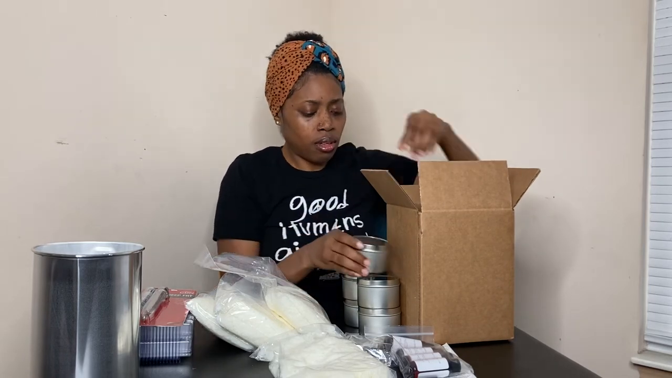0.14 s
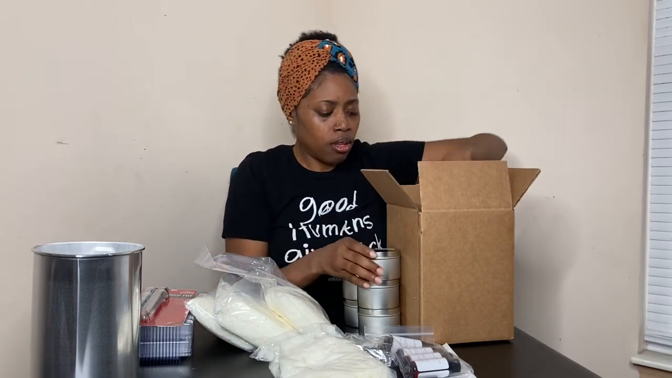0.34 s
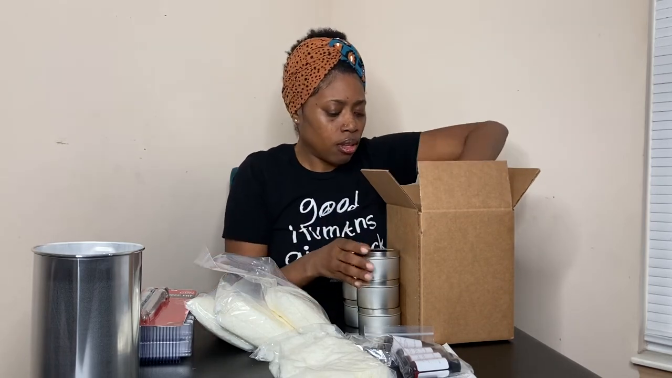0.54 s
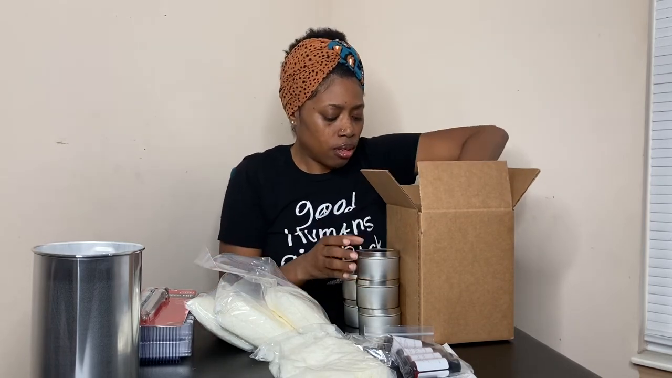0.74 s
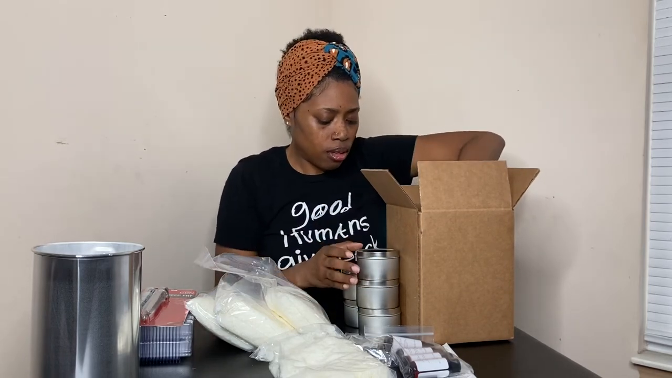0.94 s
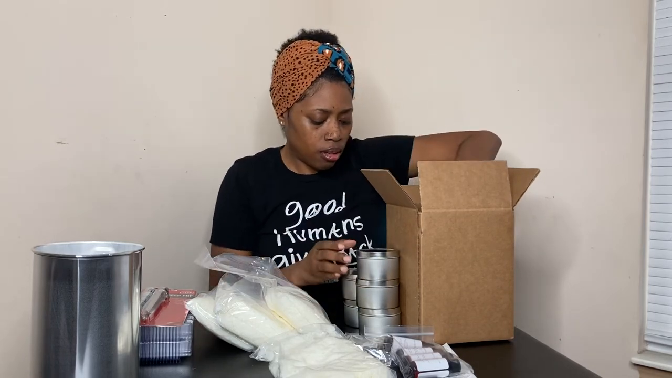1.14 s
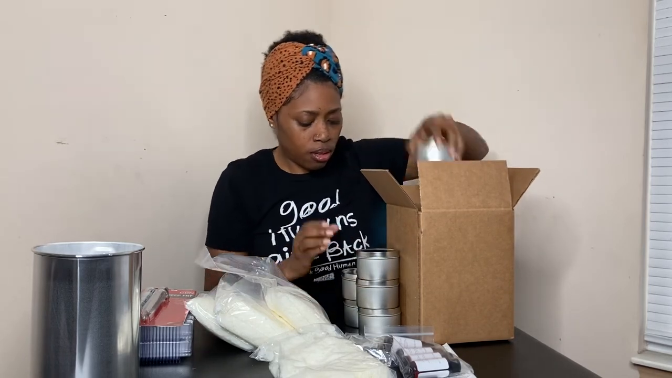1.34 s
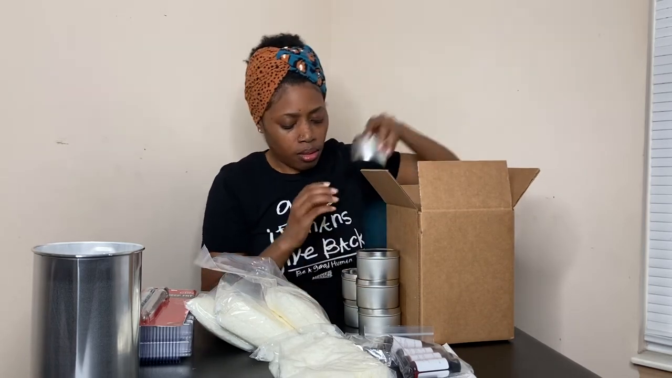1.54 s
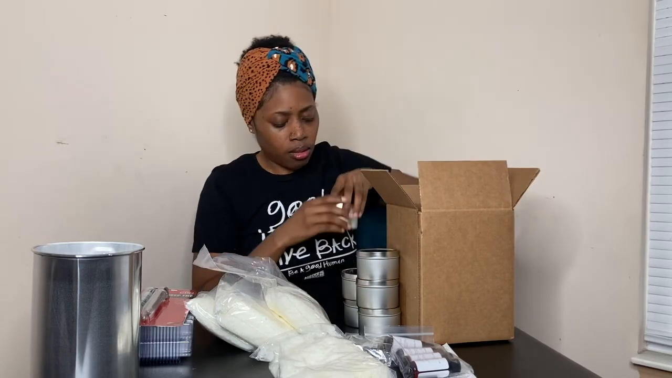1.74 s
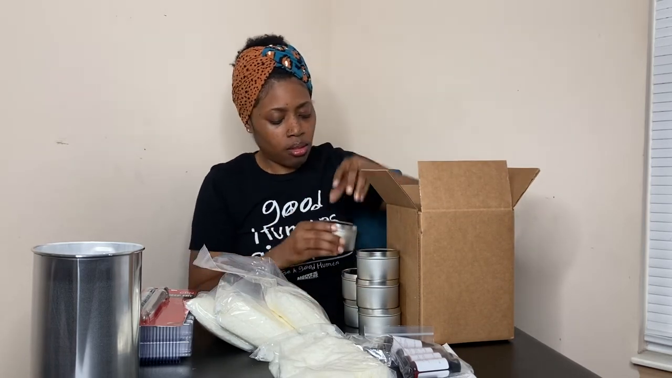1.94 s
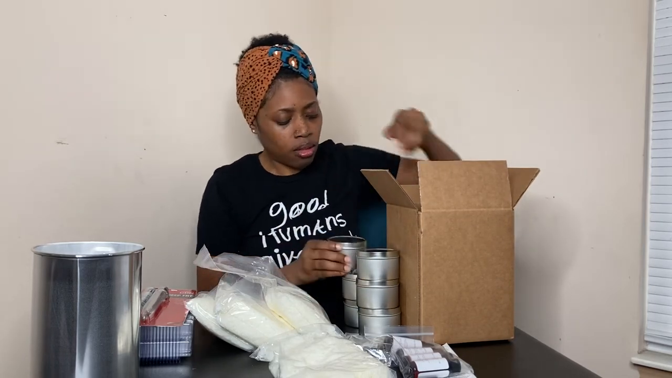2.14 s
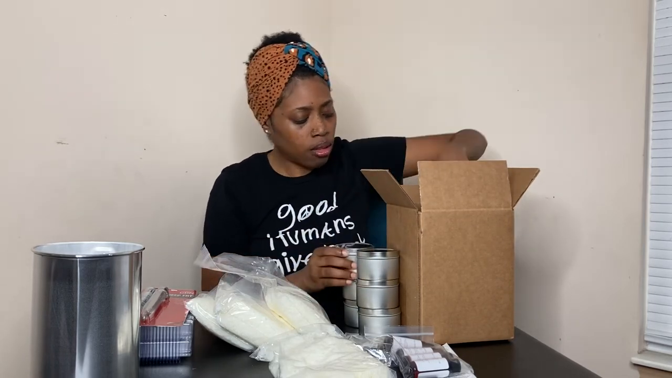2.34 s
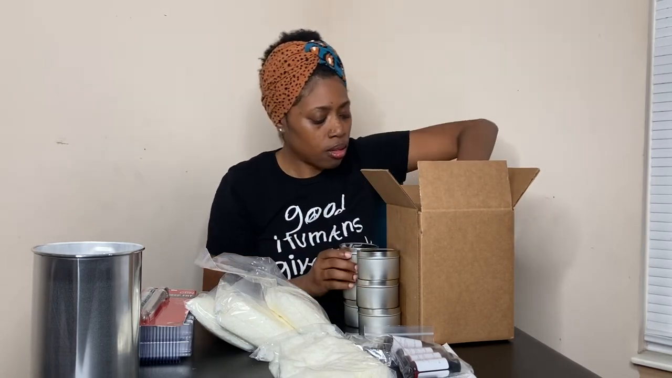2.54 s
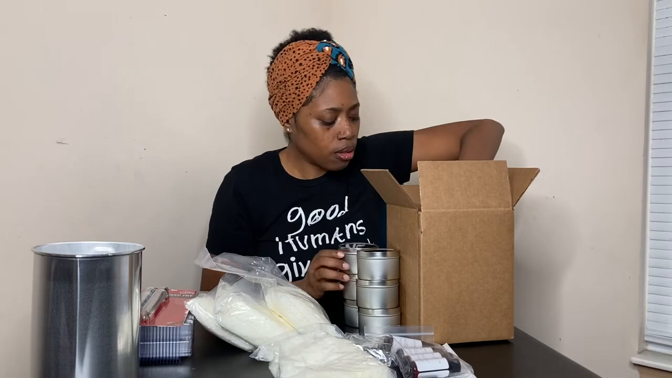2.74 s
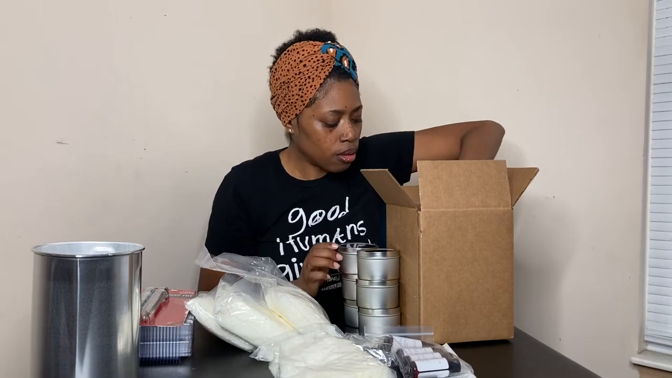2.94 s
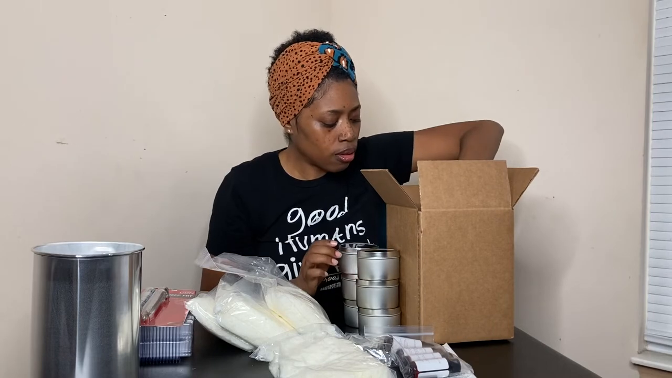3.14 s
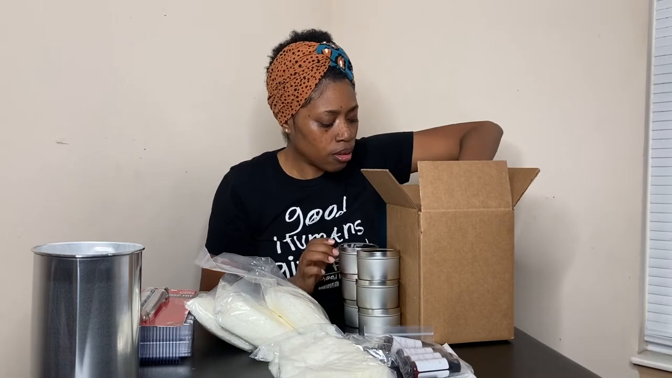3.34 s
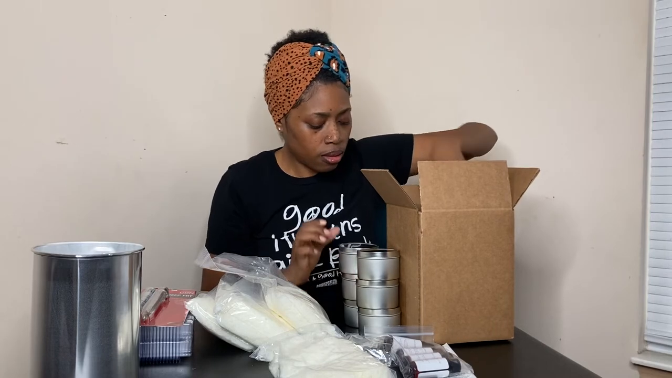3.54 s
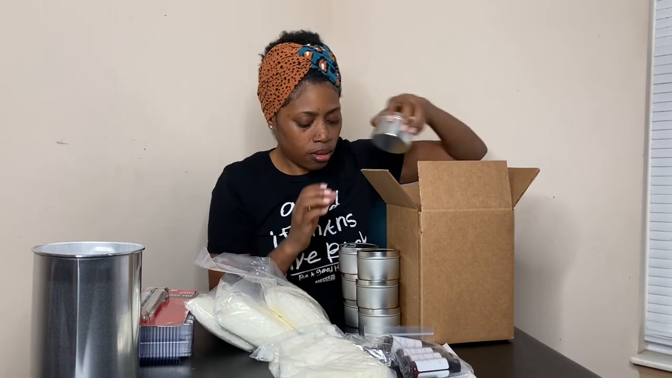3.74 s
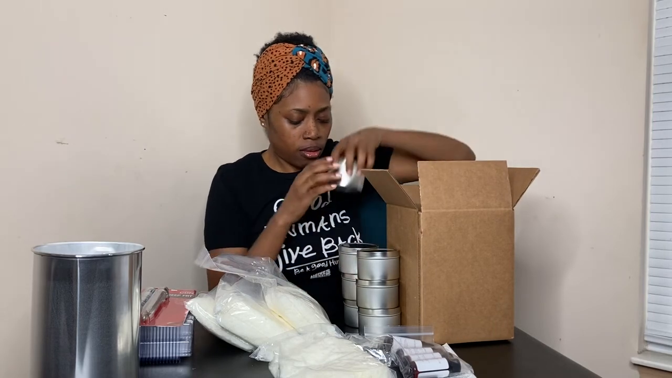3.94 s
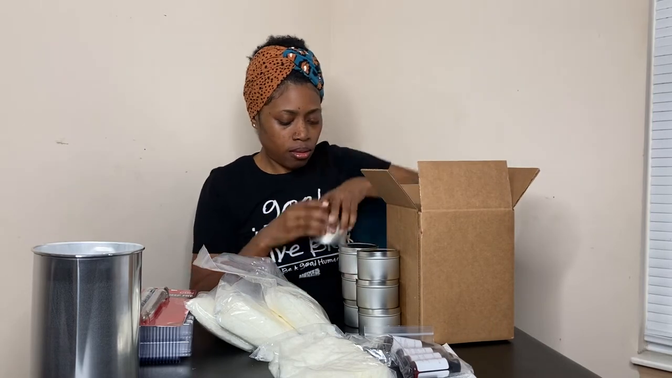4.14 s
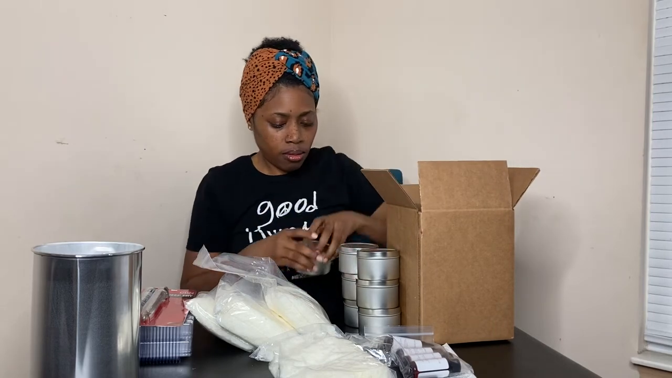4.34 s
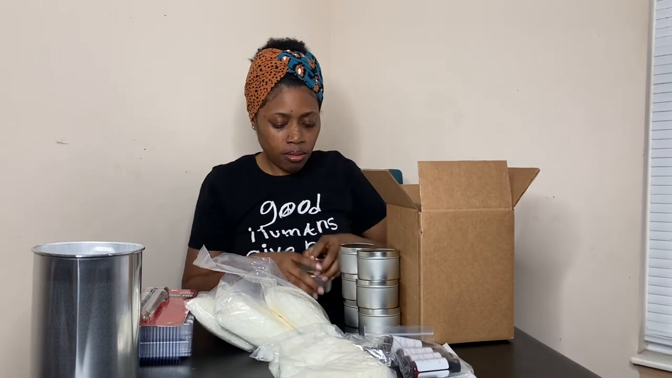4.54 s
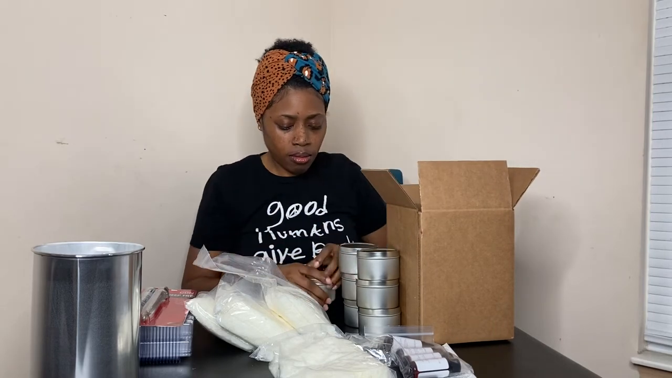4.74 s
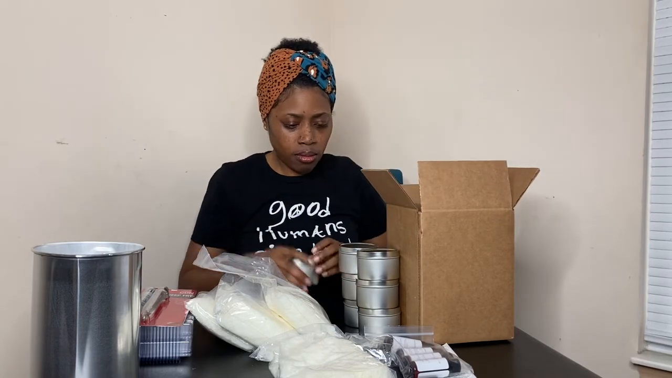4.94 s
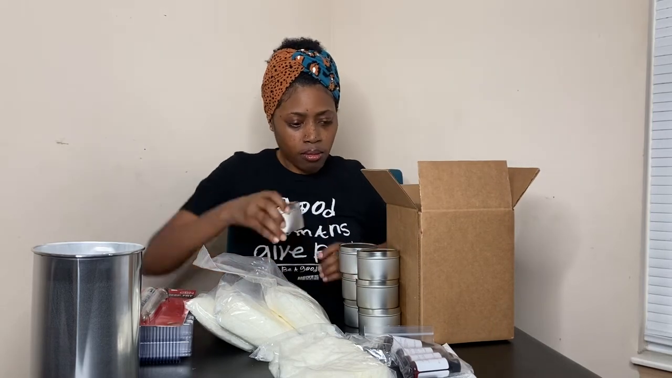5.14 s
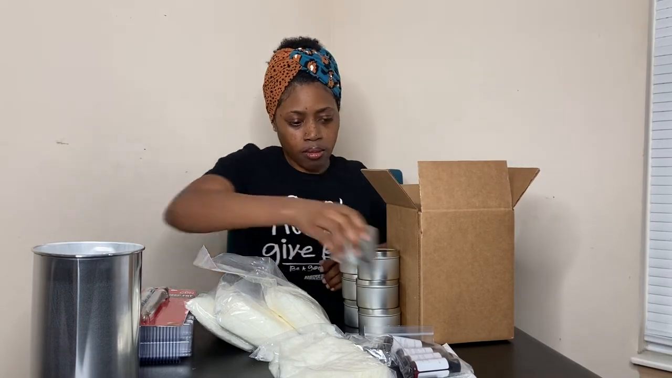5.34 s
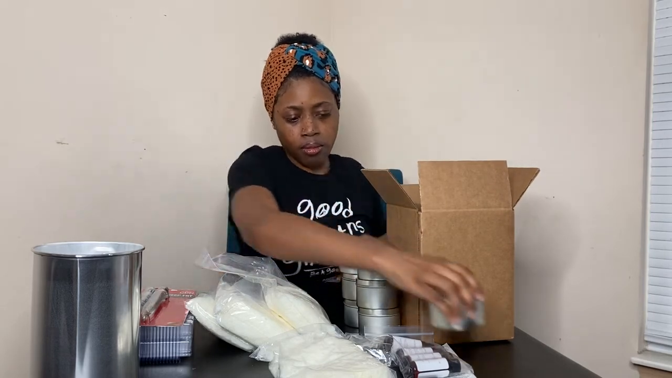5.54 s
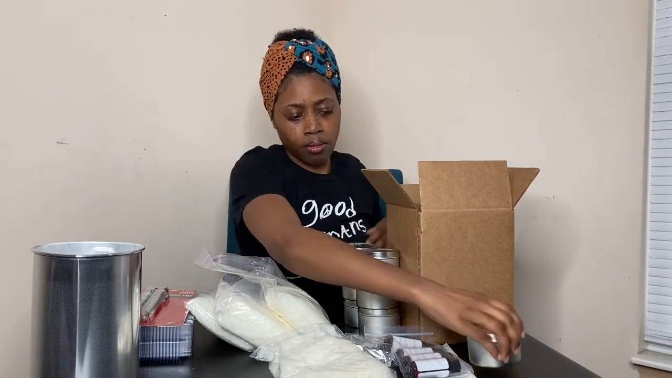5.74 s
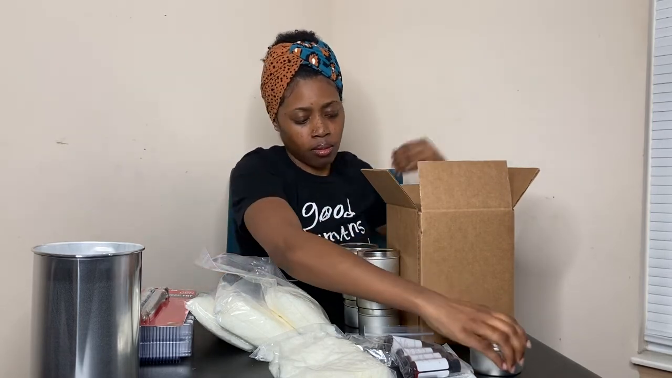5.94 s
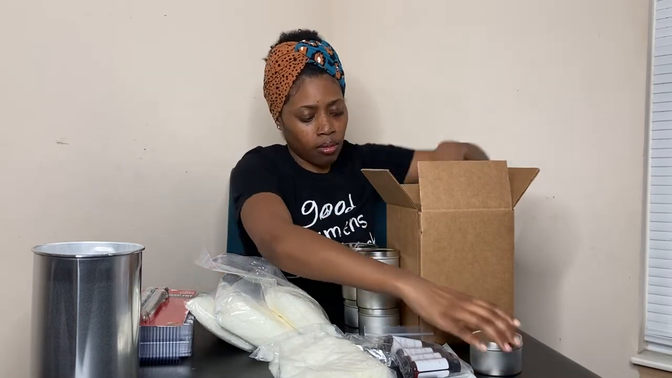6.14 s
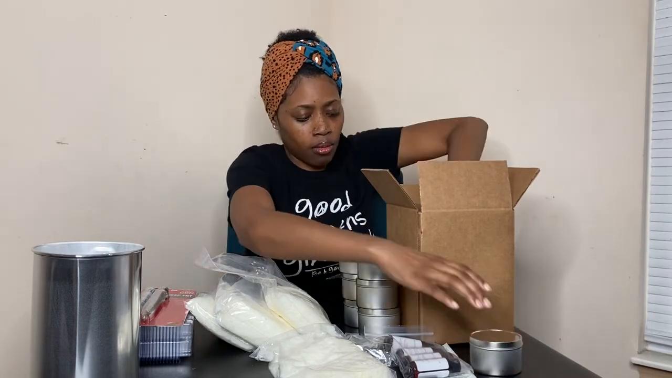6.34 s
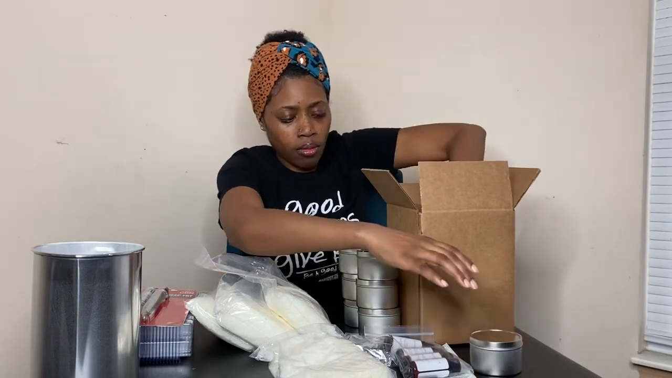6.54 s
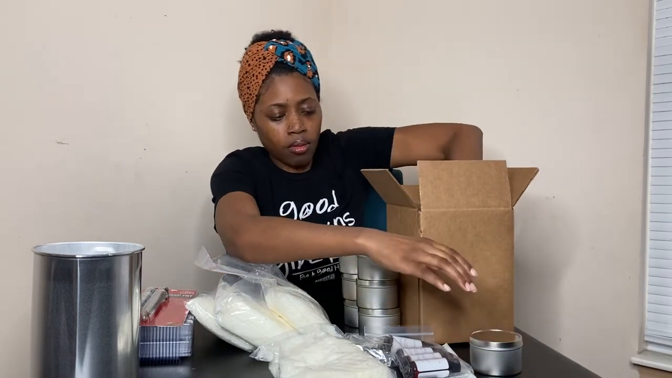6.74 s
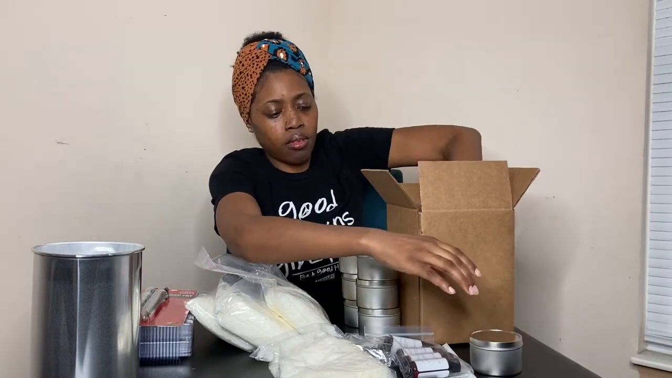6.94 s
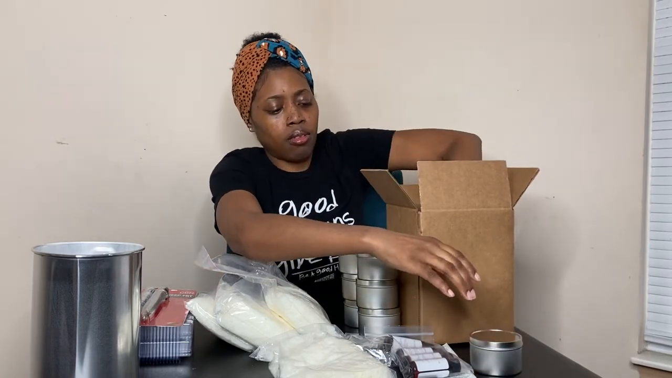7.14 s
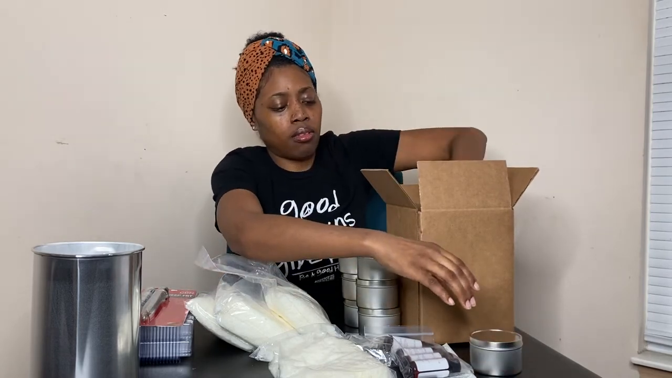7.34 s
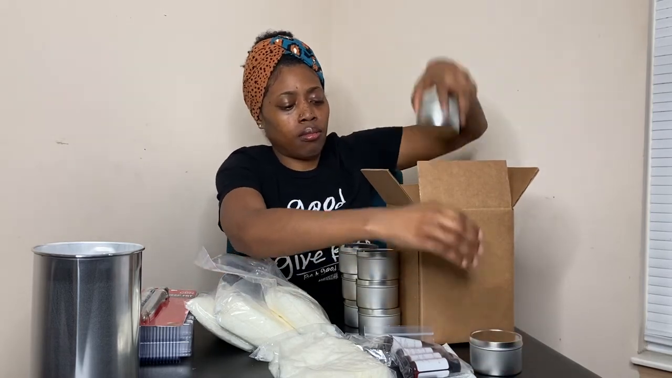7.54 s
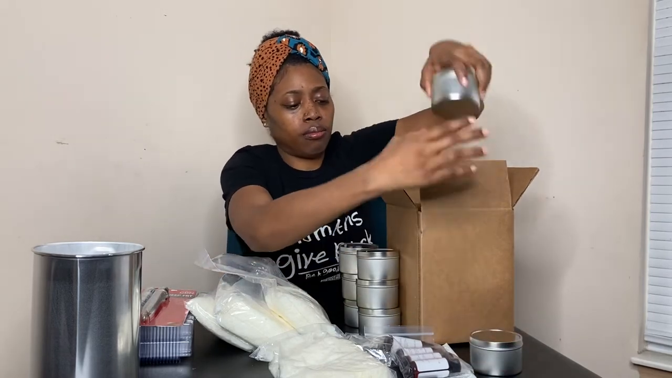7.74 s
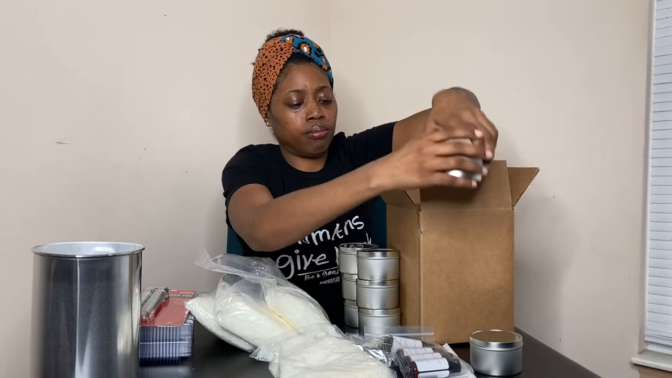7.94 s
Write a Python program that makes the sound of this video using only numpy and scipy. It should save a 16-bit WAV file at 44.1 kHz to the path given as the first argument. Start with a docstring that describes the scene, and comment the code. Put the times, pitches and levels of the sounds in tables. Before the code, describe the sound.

In a small bare room, thin metal tins clink onto a stack with a tick, a short ring and a hollow note. A cardboard box answers with dull thumps and dry scrapes as an arm reaches in. Activity comes in bursts, first at the start, then around three seconds, then after six, with quiet handling between. A stereo recorder a few steps away picks up short reflections and faint low rumble.

```python
"""Small metal tins are lifted out of a cardboard box and stacked on a table in a bare room.
A low rumble (coloured noise) runs throughout; soon tins clink (damped modes and noise bursts) as the box
takes dull bumps (panel modes, a slap and a crackle). Then an arm and tin edges drag along the cardboard
(stick-slip pulses), and later tins slip through the fingers (short high hisses). Clinks and bumps recur,
some with two weaker returns. A small stereo recorder hears it all from a few steps away."""
import sys
import numpy as np
from scipy import signal
from scipy.fft import rfft, irfft, next_fast_len
from scipy.io import wavfile
from scipy.ndimage import map_coordinates

SR = 44100
rng = np.random.default_rng(int(sys.argv[2]) if len(sys.argv) > 2 else 0)


def unload_wav(signal):
    """Save mono or channel-first audio to the path in sys.argv[1] as 16-bit WAV at rate SR, clipped to [-1, 1]."""
    wavfile.write(
        sys.argv[1],
        SR,
        np.round(np.clip(np.atleast_2d(signal).T, -1, 1) * 32767).astype(np.int16),
    )


N = 352800
AGE = np.arange(SR // 2) / SR  # seconds since a contact
CLOCK = np.arange(N) / SR  # seconds since the start


def amp(db):
    """Decibels to gain."""
    return 10 ** (np.asarray(db) / 20)


def unit(x):
    """Scale to rms 1."""
    return x / np.sqrt(np.mean(x ** 2) + 1e-20)


def along(points, hz):
    """Read (Hz, value) points on a log frequency axis."""
    f, v = np.transpose(points)
    return np.interp(np.log(hz + 1), np.log(f + 1), v)


def fade(t, t60):
    """Exponential decay, 60 dB down at t60."""
    return np.exp(-np.log(1000) * t / t60)


def touch(t, length, ease=0.025):
    """Pressure of a stroke: it eases in, holds and eases out."""
    return np.clip(np.minimum(t, length - t) / ease, 0, 1)


def colour(x, spectrum):
    """Give a signal a spectrum, at rms 1."""
    hz = np.fft.rfftfreq(len(x), 1 / SR)
    return unit(irfft(rfft(x) * amp(along(spectrum, hz)), len(x)))


def noise(spectrum, size):
    """Noise of rms 1 with the given spectrum."""
    return colour(rng.standard_normal(size), spectrum)


def burst(spectrum, t60, rise):
    """The crowd of short-lived modes that one contact sets off, as fading noise."""
    return noise(spectrum, len(AGE)) * fade(AGE, t60) * (1 - np.exp(-AGE / rise))


def favour(modes, centre_hz, boost_db, octaves):
    """The point of contact drives the modes near one frequency hardest."""
    boosted = []
    for hz, db, t60 in modes:
        distance = np.log2(hz / centre_hz) / octaves
        boosted.append((hz, db + boost_db * np.exp(-distance ** 2), t60))
    return boosted


def ring(modes, scatter_db, detune, rise, waver=0.0039):
    """Damped modes; strength and pitch vary with where the blow lands, and pitch wavers as contact shifts."""
    hz, db, t60 = np.transpose(modes)[:, :, None]
    strength, shift, sign = rng.standard_normal((3, len(modes), 1))
    drift = waver * np.cumsum(rng.standard_normal(len(AGE))) / np.sqrt(SR)
    mode_hz = hz * (1 + detune * shift)
    waves = np.sign(sign) * np.sin(2 * np.pi * mode_hz * (AGE + drift / 2))
    levels = amp(db + scatter_db * strength) * fade(AGE, t60)
    return np.sum(levels * waves, axis=0) * (1 - np.exp(-AGE / rise))


# left-right likeness of a diffuse field: (f/Hz, likeness from 0 to 1)
LIKENESS = [(50, 0.94), (140, 0.88), (250, 0.93), (450, 0.47), (1000, 0.25), (2500, 0.16), (5000, 0.083)]


def diffuse(a, b):
    """Two unrelated signals become a stereo field: near mono in the bass, wide in the treble."""
    likeness = along(LIKENESS, np.fft.rfftfreq(len(a), 1 / SR))
    turn = np.arccos(np.clip(likeness, 0, 1)) / 2
    mid, side = rfft(a) * np.cos(turn), rfft(b) * np.sin(turn)
    return irfft([mid + side, mid - side], len(a))


# decay of the bare room's tail: (f/Hz, t60/s)
ROOM_DECAY = [(100, .5), (400, 0.36), (1000, 0.29), (3000, 0.34), (7000, 0.28), (15000, 0.16)]


def in_room(x, wet_db, early_t60=0.085, tail_db=-0.5, wall_s=.0085, wall_db=-7, wall_hz=1100):
    """Direct sound, a dull echo off the near wall, dense early echoes and a tail; drawn anew at every call."""
    def field():
        return diffuse(*rng.standard_normal((2, len(AGE))))

    hz, t, z = signal.stft(field(), SR, nperseg=256)
    faded = z * fade(t, along(ROOM_DECAY, hz)[:, None])
    tail = signal.istft(faded, SR, nperseg=256)[1][:, :len(AGE)]
    early = field() * fade(AGE, early_t60)
    build_up = 1 - np.exp(-AGE / 0.00066)
    reverb = unit(early * build_up) + amp(tail_db) * unit(tail * build_up)
    response = amp(wet_db) * reverb / np.sqrt(len(AGE))
    # the echo's delay scatters around wall_s; its one-pole decay dulls it above wall_hz
    since_echo = AGE - wall_s * np.exp(0.204 * rng.standard_normal())
    echo = (since_echo > 0) * np.exp(-2 * np.pi * wall_hz * np.abs(since_echo))
    response += amp(wall_db) * echo / echo.sum()
    response[:, 0] += 1  # direct sound
    return signal.fftconvolve(x[None], response, axes=1)[:, :len(x)]


def heard(x, wet_db, size=1100):
    """A blow in the room, scaled to rms 1 over its first `size` samples."""
    wet = in_room(x, wet_db)
    return wet / np.sqrt(np.mean(wet[:, :size] ** 2))


def contacts(s, gap, late, losses):
    """A landing and, if its gap exceeds 5 ms, two weaker returns: (t/s, level/dB re the landing)."""
    landings = [(s, 0)]
    if gap > .005:
        landings += [(s + gap, losses[0]), (s + late * gap, losses[1])]
    return landings


def add(track, s, sound):
    """Mix a sound in at time s."""
    part = track[:, max(round(s * SR), 0):][:, :sound.shape[-1]]
    part += sound[..., :part.shape[1]]


# low room rumble and microphone hiss, relative spectra: (f/Hz, level/dB)
RUMBLE_SPECTRUM = [(15, -23), (25, -22), (38, -3.5), (55, -6), (95, -3.5), (140, -13), (240, -17.5),
                   (380, -18.5), (450, -27.5), (700, -30), (1200, -36.5), (2000, -40), (6000, -46.5),
                   (10000, -80)]
HISS_SPECTRUM = [(2000, -26), (5000, -10), (8000, 1), (12000, 0.5), (14500, -5), (16000, -6.5)]


def room_tone():
    """A steady low rumble under faint microphone hiss, both coloured noise."""
    rumble = unit(diffuse(noise(RUMBLE_SPECTRUM, N), noise(RUMBLE_SPECTRUM, N)))
    hiss = diffuse(noise(HISS_SPECTRUM, N), noise(HISS_SPECTRUM, N))
    return amp(-59.0) * rumble + amp(-81) * hiss


# tin meets tin: (t/s, level/dB, rim tick level/dB re the clink before its trim, wall ring level/dB re the clink,
# strongest wall mode f/Hz, gap until it rocks back t/s; it stays put at 0.005 s or less)
CLINKS = [(0.2565, -24.5, -5, -14, 2260, 0.0011), (0.2863, -24.5, -12.5, -16, 2770, .0328),
          (0.7783, -33, -10.5, -12, 2350, 0.039), (1.052, -41.5, -18, -10.5, 1470, 0.0061),
          (2.2998, -24, -11, -11.5, 3160, .0305), (2.7672, -42.5, -18.5, -13.5, 3350, 0),
          (2.8995, -30, -12.5, -16, 2200, .02), (3.152, -35.5, -19.5, -11, 4000, 0.0041),
          (3.4179, -33.5, -10, -12.5, 2394, 0.017), (3.7263, -63, -6, -8.5, 1613, 0),
          (4.2683, -71, -15, -7, 1517, 0.005), (4.527, -45, 0, -16, 4090, 0),
          (4.7392, -66, -17, -14, 2388, 0), (4.932, -66.5, -3.5, -6, 5026, 0.00036),
          (5.0089, -56.5, -11, -9, 1567, 0.0025), (5.858, -57, -8, -9, 3210, 0.00019),
          (5.901, -51.5, 2.5, -9, 5030, 0), (6.0303, -64.5, -8, -7.5, 1597, 0.0014),
          (6.3465, -40, -23, -11, 2222, 0), (6.592, -31, -18, -16.5, 2323, 0.0011),
          (6.7331, -34.5, -8.5, -9.5, 2200, 0.0032), (7.9166, -50, -7.5, -7.5, 2150, 0.035)]
# ringing modes of a tin's wall and lid: (f/Hz, relative level/dB, t60/s)
WALL_MODES = [(1082, -12.5, 0.094), (1338, -4, 0.063), (1470, -6.5, 0.1), (1531, 2, 0.05),
              (1580, -4.5, 0.07), (2108, -2, 0.055), (2266, -3.5, 0.061), (2414, -12.5, 0.053),
              (2690, -7.5, 0.068), (2896, -14.5, 0.093), (3000, -7.5, 0.098), (3140, -5.5, 0.079),
              (3230, -6, 0.076), (3850, -10.5, 0.097), (4030, -6, 0.11), (4150, -5.5, .08),
              (5005, -6, 0.12), (5155, -5.5, 0.053), (6360, -10, 0.16), (6830, -7.5, 0.13),
              (7300, -9, 0.073), (7900, -5, 0.066), (10310, -6, 0.09)]
# hollow modes of a stack of tins: (f/Hz, relative level/dB, t60/s)
HOLLOW_MODES = [(387.8, -1.5, 0.095), (422.5, -7.5, 0.18), (474, 1.5, 0.056), (604.6, 1.5, 0.039),
                (693, -7.5, 0.11), (752, -8.5, 0.11)]
# crack and rim tick, relative spectra: (f/Hz, level/dB)
CRACK_SPECTRUM = [(500, -12), (1100, 2.5), (2500, -5), (4200, -2), (5800, -12.5), (8000, -29), (16000, -58)]
TICK_SPECTRUM = [(3000, -33), (6000, -8), (7500, -5), (9000, 3), (10500, -2), (13000, -3), (14500, -12),
                 (16000, -10)]
TIN_RETURN = 2.2  # the second return comes this many times as late as the first
TIN_LOSS_DB = (-10, -11)  # first and second return re the landing
HOLLOW_DB, HOLLOW_PER_TICK = -10.5, -0.42  # the more a blow lands on the rim, the less the hollow answers


def tins(left_db=.5):
    """Rim meets rim: a tick and a crack, the thin wall rings, the hollow stack swells in answer."""
    out = np.zeros((2, N))
    for landing, db, tick_db, ring_db, wall_hz, rock_s in CLINKS:
        modes = favour(WALL_MODES, wall_hz, boost_db=9.5, octaves=.06)
        for s, loss_db in contacts(landing, rock_s, TIN_RETURN, TIN_LOSS_DB):
            ringing = ring(modes, scatter_db=1.5, detune=.002, rise=.0012, waver=.0008)
            wall = amp(ring_db) * heard(ringing, wet_db=1)
            snap = burst(CRACK_SPECTRUM, t60=.025, rise=.0005)
            crack = amp(-15.5) * heard(snap, wet_db=7.5)
            rim = burst(TICK_SPECTRUM, t60=.009, rise=.0004)
            tick = amp(tick_db - 4.5) * heard(rim, wet_db=-2.5)
            hollow = ring(HOLLOW_MODES, scatter_db=1, detune=.005, rise=.004)
            body = amp(HOLLOW_DB + HOLLOW_PER_TICK * tick_db) * heard(hollow, wet_db=-5.5)
            add(out, s, amp(db + loss_db) * (wall + crack + tick + body))
    return out * amp([[left_db], [-left_db]])


# dull bumps on the box and table: (t/s, level/dB, strongest panel mode f/Hz,
# slap level/dB re the bump before its trim, gap until the load settles back t/s; it stays put at 0.005 s or less)
BUMPS = [(0.259, -20.5, 262, -19, 0.033), (0.535, -37.5, 460, -11.5, 0.012),
         (0.6, -37.5, 404, -17.5, 0.0018), (0.725, -38.5, 239, -20, 0.0013), (0.777, -23, 330, -16, 0.002),
         (0.847, -23, 354.6, -20, 0.00076), (0.872, -25, 240, -24, 0), (2.593, -47.5, 451.7, -23, 0),
         (2.833, -27, 210.5, -20.5, 0.0033), (2.899, -20, 235, -12, .043), (3.001, -27.5, 218, -31, 0),
         (3.073, -37.5, 199, -9, 0.00045), (3.158, -22.5, 252, -12, 0), (3.42, -29.5, 598, -9.5, 0.0089),
         (4.53, -41.5, 248.4, -16, 0), (5.9, -39, 604.5, -17, 0), (6.342, -22, 280.6, -15.5, 0.0023),
         (6.447, -41.5, 369.2, -8, .03), (6.59, -27.5, 223.1, -7, 0.031), (6.734, -19, 400, -14.5, 0.018),
         (6.848, -29, 435.9, -8, 0.004), (6.892, -21, 187, -11, 0), (7.083, -33, 357, -12, 0.0033),
         (7.187, -39, 290.2, -13, 0.0016), (7.2, -34, 184.9, -12, 0.00093),
         (7.907, -39.5, 253, -28, 0.0038)]
# cardboard panel modes: (f/Hz, relative level/dB, t60/s)
PANEL_MODES = [(82.3, -13.5, 0.22), (139.2, -17, 0.36), (203.8, -1.5, 0.054), (238.2, 0, 0.086),
               (303.4, -5.5, 0.11), (343.6, -1, 0.047), (375, -4, 0.079), (450.5, -1, 0.062),
               (522.5, 0.5, 0.07), (596.4, -1.5, 0.046), (754, -4.5, 0.036)]
# slap or rasp of the surface, and its crackle or grit, relative spectra: (f/Hz, level/dB); box_rubs plays both too
SLAP_SPECTRUM = [(350, -3), (700, -1), (1070, 2.5), (1250, -2.5), (1500, -1), (1900, -9.5), (2800, -17),
                 (5000, -26.5), (16000, -73)]
GRIT_SPECTRUM = [(1500, 5), (3000, 1.5), (4100, 1.5), (5800, -4), (7500, 2.5), (9000, 1.5), (12500, -0.5),
                 (14500, -9), (16000, -8.5)]
LOAD_RETURN = 2.5  # the second return comes this many times as late as the first
LOAD_LOSS_DB = (-9.5, -12)  # first and second return re the landing
CRACKLE_DB = -15  # crackle of the cardboard re its slap


def box_bumps(left_db=0.2):
    """A knuckle or tin lands: the nearest panel booms, the surface slaps and crackles."""
    out = np.zeros((2, N))
    for landing, db, panel_hz, slap_db, settle_s in BUMPS:
        modes = favour(PANEL_MODES, panel_hz, boost_db=8, octaves=0.26)
        for s, loss_db in contacts(landing, settle_s, LOAD_RETURN, LOAD_LOSS_DB):
            panels = ring(modes, scatter_db=1, detune=.012, rise=.002)
            boom = amp(-8.0) * heard(panels, wet_db=-3.5)
            smack = burst(SLAP_SPECTRUM, t60=.05, rise=.0012)
            slap = heard(smack, wet_db=-3.0)
            crumple = burst(GRIT_SPECTRUM, t60=0.067, rise=0.0014)
            crackle = amp(CRACKLE_DB) * heard(crumple, wet_db=10)
            surface = amp(slap_db - 5) * (slap + crackle)
            add(out, s, amp(db + loss_db) * (boom + surface))
    return out * amp([[left_db], [-left_db]])


def friction(spectrum, rough_db, clumps_hz, slips_hz):
    """Stick and slip: a stream of tiny releases that come in stronger and weaker clumps."""
    knots = np.clip(rng.standard_normal(N // 50), -2, 2)
    grip = amp(rough_db * map_coordinates(knots, [CLOCK * clumps_hz], order=1))
    slips = rng.standard_normal(N) * (rng.random(N) < slips_hz / SR)
    return colour(slips * grip, spectrum)


# the arm drags along the box, one list for each of three reaches: (t/s, pressure level/dB)
REACHES = [
    [(0.47, -75), (0.544, -64.5), (0.654, -72), (0.746, -60), (0.956, -84), (0.99, -59.5), (1.108, -60),
     (1.15, -91)],
    [(2.78, -60), (2.828, -58.5), (2.944, -51), (2.992, -61), (3.072, -53.5), (3.314, -61.5), (3.4, -87)],
    [(6.36, -80), (6.39, -82), (6.51, -62.5), (6.782, -53.5), (7.016, -53.5), (7.144, -56), (7.276, -64),
     (7.36, -91.5)],
]
# a tin's edge scrapes the cardboard: (t/s, length t/s, rasp level/dB, grit level/dB), before the rubs' trim
SCRAPES = [(0.793, 0.094, -41.5, -47), (3.263, 0.069, -58, -70), (6.34, 0.32, -55.5, -54.5),
           (6.806, .115, -35.5, -47), (7.034, 0.082, -75, -68), (7.242, 0.074, -81, -55.5),
           (7.44, 0.053, -70, -74), (7.875, 0.19, -63, -60)]
# drone of the rubbed panel, relative spectrum: (f/Hz, level/dB)
DRONE_SPECTRUM = [(60, -12), (150, -1.5), (225, -0.5), (300, -4.5), (440, -3), (650, -8), (1000, -26.5),
                  (3000, -55)]
FIRM_DB = -57  # the pressure level that counts as firm
# levels at a firm pressure before the rubs' trim, and dB gained per dB of pressure; the rasp gains 1
DRONE_DB, DRONE_GROWS = -50.5, 0.4
RASP_DB = -60
GRIT_DB, GRIT_GROWS = -63, 2.83


def box_rubs():
    """Arm and tins drag along the cardboard, which drones under the rasp; pressure makes it louder, grittier."""
    drone = friction(DRONE_SPECTRUM, rough_db=-0.5, clumps_hz=44.4, slips_hz=666)
    rasp = friction(SLAP_SPECTRUM, rough_db=5.5, clumps_hz=55, slips_hz=650)
    grit = friction(GRIT_SPECTRUM, rough_db=2.5, clumps_hz=70, slips_hz=1800)
    out = np.zeros(N)
    for reach in REACHES:
        times, pressure_db = np.transpose(reach)
        press = np.interp(CLOCK, times, pressure_db) - FIRM_DB
        drag = amp(DRONE_DB + DRONE_GROWS * press) * drone
        drag += amp(RASP_DB + press) * rasp
        drag += amp(GRIT_DB + GRIT_GROWS * press) * grit
        out += touch(CLOCK - times[0], times[-1] - times[0]) * drag
    for s, length, rasp_db, grit_db in SCRAPES:
        scrape = amp(rasp_db) * rasp + amp(grit_db) * grit
        out += touch(CLOCK - s, length) * scrape
    return amp(-5.5) * in_room(out, wet_db=-0.5)


# skin sliding on a tin: (t/s, length t/s, level/dB, centre f/Hz)
SLIDES = [(1.667, 0.13, -63.5, 12500), (1.846, 0.042, -71, 11500), (4.016, 0.086, -75.5, 4830),
          (4.134, 0.061, -68.5, 11300)]


def finger_slides():
    """A tin slips through the fingers with a short high hiss, noise peaking at its centre frequency."""
    out = np.zeros((2, N))
    for s, length, db, hz in SLIDES:
        spectrum = [(hz / 3, -40), (hz * .65, -6), (hz, 0), (hz * 1.14, -4), (hz * 2, -30)]
        hiss = noise(spectrum, len(AGE))
        add(out, s, amp(db) * in_room(hiss * touch(AGE, length), wet_db=-0.5))
    return out


def scene():
    """Everything that sounds at the table, and the room tone."""
    return room_tone() + tins() + box_bumps() + box_rubs() + finger_slides()


# above the fold the recorder feeds both channels one signal, turned in phase: (f/Hz, left lead/rad)
PHASE_LEAD = [(7200, 0), (8800, -3.0), (9300, -3.3), (11000, -6.2), (11800, -6.4), (13200, -9.3),
              (14200, -9.6), (15100, -12.56)]
FOLD_HZ, TOP_HZ = 6300, 15900  # middle of the crossfade to shared treble, and of the top cutoff


def record(dry, low_cut_hz=35):
    """The recorder thins the deepest bass, shares the treble between its channels and limits the band."""
    size = next_fast_len(N + SR // 2)
    hz = np.fft.rfftfreq(size, 1 / SR)
    both = rfft(dry, size)
    lead = np.interp(hz, *np.transpose(PHASE_LEAD))
    shared = both[0] * np.exp(.5j * np.array([lead, -lead]))  # half the lead on each side
    share = np.interp(hz, [FOLD_HZ - 500, FOLD_HZ + 500], [0, 1])
    top = np.interp(hz, [TOP_HZ - 150, TOP_HZ + 150], [1, 0])
    low_cut = (1j * hz / (low_cut_hz + 1j * hz)) ** 2
    folded = share * shared + (1 - share) * both
    return irfft(folded * top * low_cut, size)[:, :N]


dry = scene()
out = record(dry)
unload_wav(out)
```